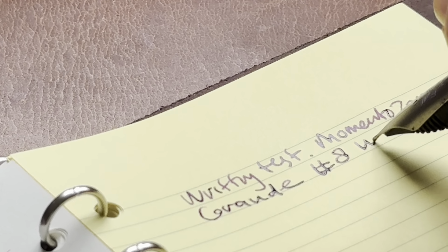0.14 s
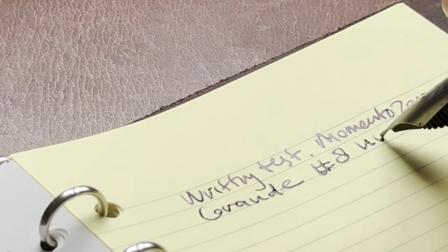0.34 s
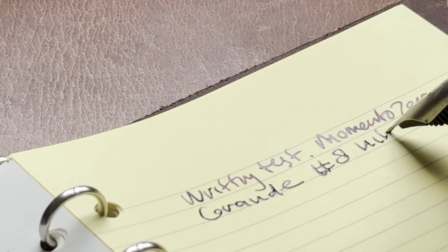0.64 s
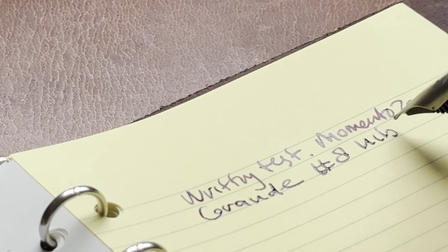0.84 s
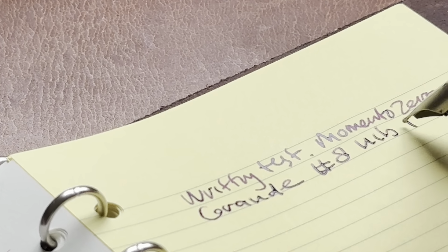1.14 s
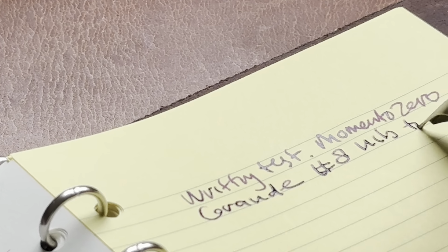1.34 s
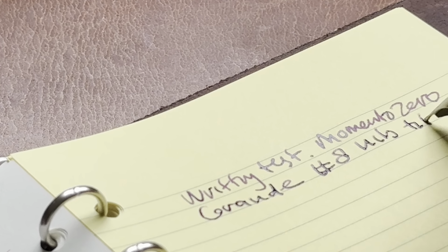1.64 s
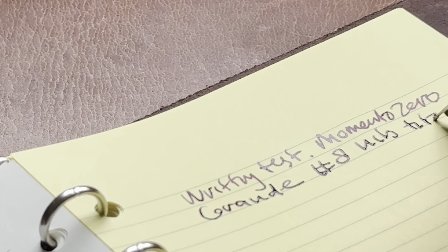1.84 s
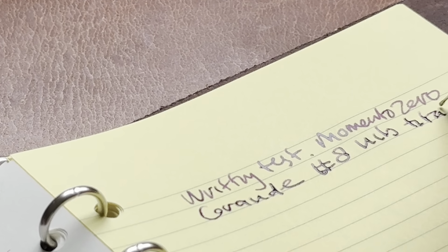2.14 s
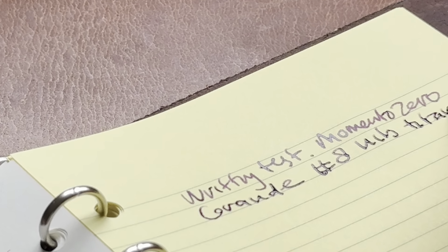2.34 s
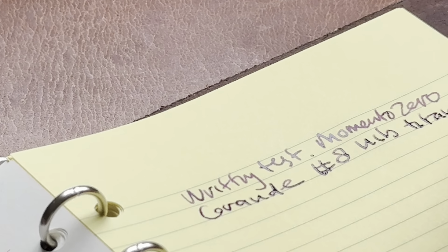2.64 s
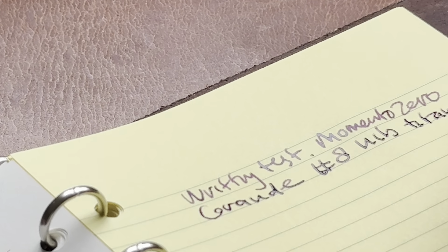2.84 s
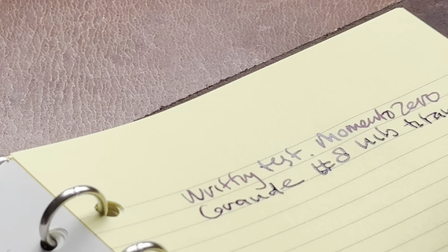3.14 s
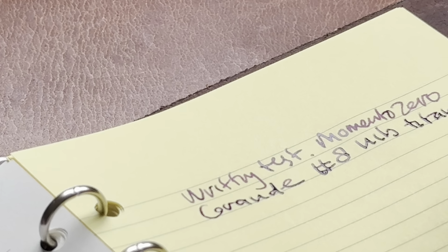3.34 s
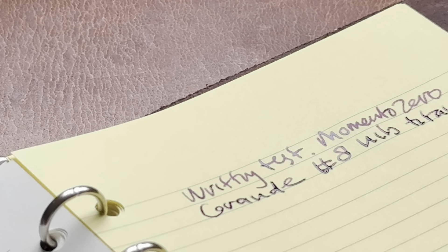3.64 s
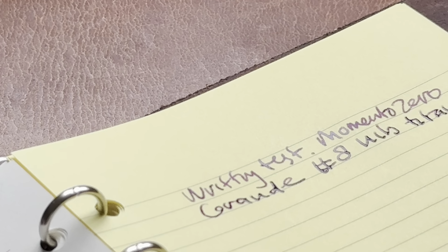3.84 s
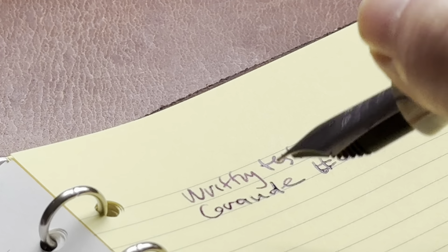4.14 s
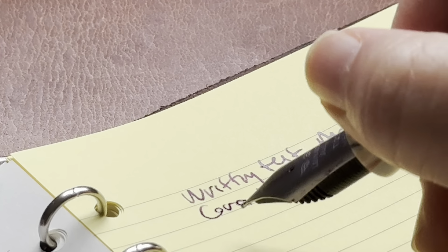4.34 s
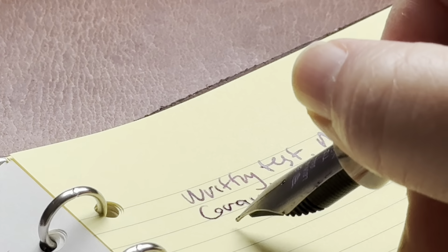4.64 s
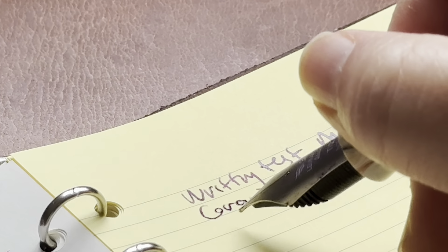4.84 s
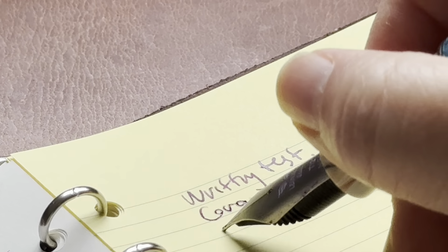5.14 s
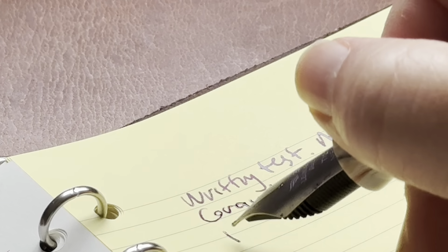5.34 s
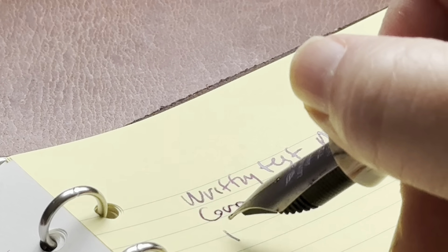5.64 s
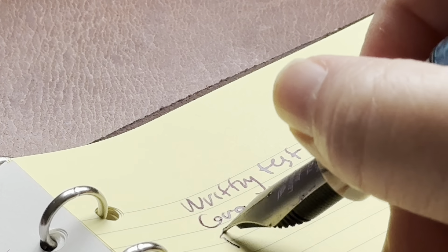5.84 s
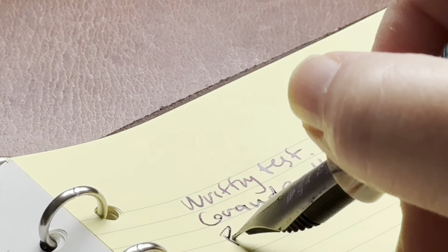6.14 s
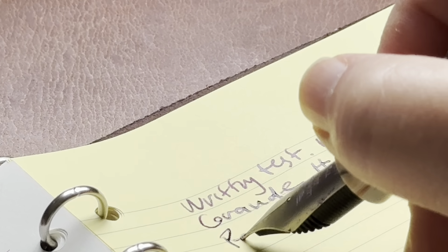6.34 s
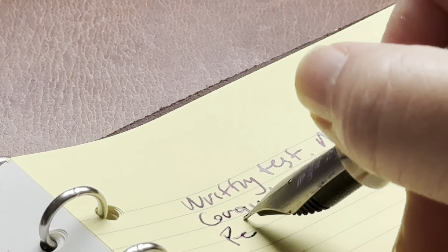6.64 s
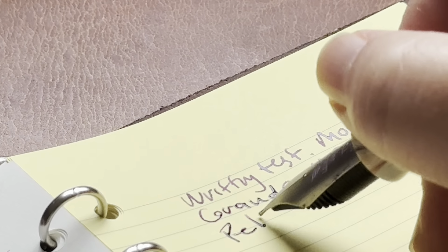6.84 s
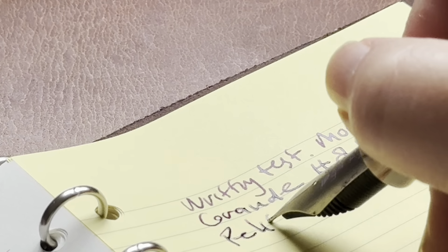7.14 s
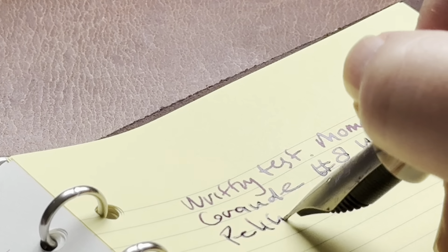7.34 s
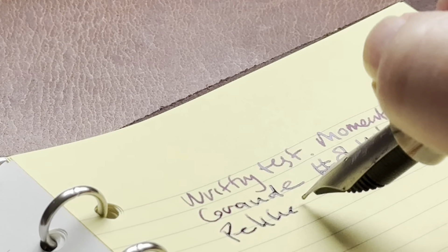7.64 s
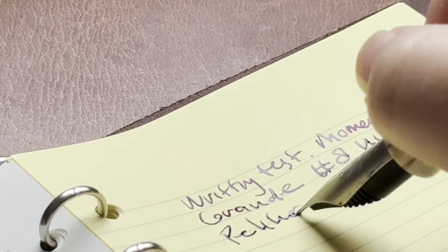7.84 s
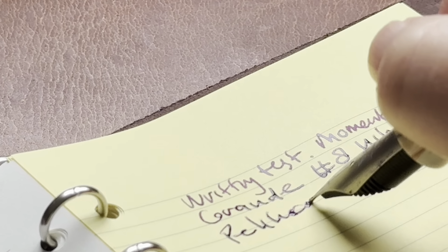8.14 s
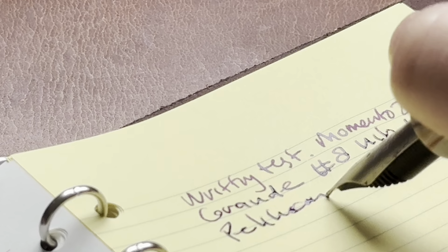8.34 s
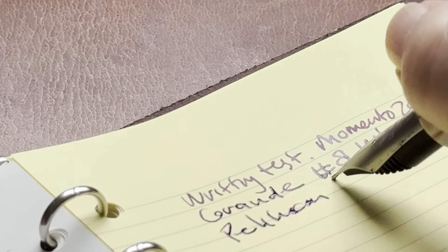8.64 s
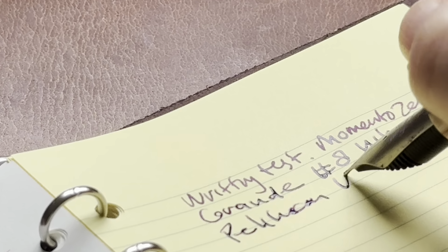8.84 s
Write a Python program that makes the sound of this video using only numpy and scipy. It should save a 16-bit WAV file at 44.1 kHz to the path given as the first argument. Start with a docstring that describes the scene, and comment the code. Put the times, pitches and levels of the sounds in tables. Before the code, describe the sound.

A close stereo microphone in a small quiet room picks up a fountain pen on paper. From 0 to 2.7 s come quick, thin, dry scratches, each about a tenth of a second, with faint ticks and a soft hiss of the sliding hand. Beneath them a low engine tone outside rises slightly, then drops in pitch and fades out by 3 s, amid traffic rumble. A few more light strokes end near 3.5 s. From 3.4 to 4.1 s the hand shifts in soft, dull puffs. A faint pause follows, with distant tyre wash swelling around 5 to 5.5 s. Writing resumes at about 5.2 s, louder and crisper, with sharp little nib clicks between 5.8 and 7.6 s and scratches until 8.3 s. At 8.4 s the hand brushes the page with a short bright swish, and a low desk thud lands at 8.5 s. Two last strokes follow over quiet rumble and hiss.

```python
"""A fountain pen writes on a pad of paper near a stereo microphone, in a quiet room.
Each stroke excites nib and paper resonances with fibre clicks; tip noise and damped modes tick at the nib.
The hand moves to a new line in soft noise puffs, rubs the page, then brushes it and bumps the desk.
Outside, a harmonic engine tone drones and fades while filtered noise carries two far vehicles,
over low noise swells, far traffic and microphone hiss."""
import sys
import numpy as np
from scipy import signal
from scipy.fft import rfft, irfft, next_fast_len
from scipy.io import wavfile
from scipy.ndimage import uniform_filter1d

SR = 44100
rng = np.random.default_rng(int(sys.argv[2]) if len(sys.argv) > 2 else 0)


def transcribe(u):
    """Save the signal u as a 16-bit wav file named by the first command-line argument.

    u: samples, shape (n,) or (channels, n), limited to [-1, 1]; the rate is SR.
    q: integer samples, one column per channel.
    """
    v = np.clip(np.atleast_2d(u).T, -1, 1)
    q = np.round(v * 32767).astype(np.int16)
    wavfile.write(sys.argv[1], SR, q)


N = 396459
TIME = np.arange(N) / SR

# rumble of traffic through the walls: (frequency [Hz], relative level [dB])
RUMBLE = [(15, -58), (30, -19.5), (45, -3.5), (58, 2.5), (80, 3), (105, -0.5), (135, -3), (165, -5),
          (195, -7.5), (245, -6), (290, -18), (390, -20.5), (550, -37), (900, -46.5), (4000, -110)]


def amp(db):
    """Decibel law: 20 dB is a tenfold amplitude."""
    return 10 ** (np.asarray(db) / 20)


def evened(x):
    """Power normalisation to an rms of 1."""
    return x / np.sqrt(np.mean(x ** 2) + 1e-30)


def read(points, hz):
    """Interpolation of a spectrum on a log-frequency axis, as hearing spaces pitch."""
    f, value = np.transpose(points)
    return np.interp(np.log(hz + 1), np.log(f + 1), value)


def along(rows, t):
    """Linear interpolation in time of every column after the first."""
    s, *columns = np.transpose(rows)
    return [np.interp(t, s, c) for c in columns]


def add(mix, s, sound):
    """Superposition: a sound is summed into the mix from time s on."""
    start = round(s * SR)
    sound = sound[max(-start, 0):]
    part = mix[max(start, 0):][:len(sound)]
    part += sound[:len(part)]


def band(x, lo_hz, hi_hz, order=2):
    """Band-pass filtering with a Butterworth response."""
    sos = signal.butter(order, [lo_hz, min(hi_hz, .49 * SR)], "band", fs=SR, output="sos")
    return signal.sosfilt(sos, x)


def drift(size, hz):
    """Low-passed noise: slow chance of rms 1, changing about hz times a second."""
    f = np.fft.rfftfreq(size, 1 / SR)
    noise = rfft(rng.standard_normal(size))
    return evened(irfft(noise * np.exp(-(f / hz) ** 2), size))


def swell(t, rise, fall, squareness=2.7):
    """Bell-shaped motion: peak 1 at t = 0, down to 1/e after the rise or fall time."""
    return np.exp(-abs(t / np.where(t < 0, rise, fall)) ** squareness)


def nearness(t, s, width_s):
    """Inverse-distance law for a pass on a straight road: 1 at time s, 3 dB less width_s away."""
    return 1 / np.hypot(1, (t - s) / width_s)


def diffuse(spectrum, shift=1, patchy_db=1.0, size=2048):
    """Diffuse-field coherence: noise partly alike at two ports; shift scales its frequencies."""
    # likeness of the ports in diffuse sound: (frequency [Hz], correlation [0-1])
    likeness = [(60, 1), (150, 0.96), (300, 0.87), (750, 0.43), (1200, 0.64), (2200, 0.97), (6000, 0.98),
                (8000, 0.94), (10000, 0.92), (15000, 0.85)]
    hop = size // 4
    t = np.arange(N // hop + 5) * hop / SR
    hz = np.fft.rfftfreq(size, 1 / SR)
    a, b, c, d, patches = rng.standard_normal((len(t), len(hz), 5)).T
    same = np.clip(read(likeness, hz), -1, 1)[:, None]
    left = a + 1j * b
    right = same * left + np.sqrt(1 - same ** 2) * (c + 1j * d)
    # the spectrum is patchy in time and frequency
    patches = uniform_filter1d(patches, size=6, axis=0)
    patches = evened(uniform_filter1d(patches, size=8, axis=1))
    scale = shift(t) if callable(shift) else shift
    colour_db = read(spectrum, hz[:, None] / scale) + patchy_db * patches
    frames = np.array([left, right]) * amp(colour_db)
    return evened(signal.istft(frames, nperseg=size, noverlap=size - hop)[1][:, :N])


def fibres(speed, base_rate_hz=2000, spread_db=2.5, smooth=0.91, tooth_db=1.33):
    """Stick-slip on paper fibres: random clicks, denser as the nib runs faster, over a smooth slide."""
    chance, size = rng.random((2, len(speed)))
    sign, slide = rng.standard_normal((2, len(speed)))
    density = 0.41 + 0.71 * speed  # scales the base rate of catches
    height = amp(spread_db * np.minimum(-np.log(1 - size), 3.5))  # most catches are small, a few large
    catches = (chance < base_rate_hz * density / SR) * np.sign(sign) * height
    friction = evened(catches / np.sqrt(density)) + smooth * slide
    return friction * amp(tooth_db * drift(len(speed), 100))


def strokes(body_db=1.5, ripple_db=4.0, paper_width_hz=200, paper_spread=0.044,
            nib_db=2.0, nib_width_hz=230, size=16384):
    """Source-filter principle: fibre clicks excite nib and paper resonances that vary over the page."""
    # pen strokes, timed between the 1/e points of their speed: (start [s], length [s],
    # level of 4.5-9 kHz at full speed [dB], weight: level of 0.3-4.5 kHz relative to it, less body_db [dB])
    stroke_rows = [(0, 0.14, -89.5, 10), (.22, 0.12, -92.5, 14.5), (0.439, 0.086, -85.5, 9),
                   (.557, 0.054, -83, 2), (.63, 0.17, -93.5, 12), (.972, 0.089, -82.5, 9),
                   (1.193, 0.057, -78.5, 0.5), (1.249, 0.12, -91.5, 11), (1.477, 0.097, -82.5, 5),
                   (1.685, 0.071, -75, -0.5), (1.777, 0.072, -84, 2.5), (1.887, 0.057, -80, 2),
                   (1.975, 0.063, -93, 13), (2.18, 0.086, -94.5, 11.5), (2.285, 0.049, -85, 0),
                   (2.349, .11, -101, 16), (2.564, 0.11, -90.5, 8), (2.65, .065, -81.5, 0.5),
                   (2.87, .063, -92.5, 10), (2.99, 0.059, -80.5, -4), (3.083, 0.077, -90, 10.5),
                   (3.19, 0.048, -80.5, 0), (3.287, 0.1, -92, 9.5), (3.434, 0.1, -96.5, 10),
                   (3.8, .2, -100, 10), (4.115, .04, -82.5, 9.5), (5.198, 0.055, -71.5, 12),
                   (5.225, 0.062, -93, 25), (5.818, 0.056, -67, -1), (5.943, .046, -66, 6.5),
                   (6.177, 0.055, -70.5, 3.5), (6.275, 0.067, -85.5, 10.5), (6.357, 0.062, -73.5, 7.5),
                   (6.658, 0.088, -74, 12), (6.885, .086, -82, 15), (7.115, 0.073, -76, 11.5),
                   (7.213, .047, -76.5, 2.5), (7.294, 0.095, -91, 18.5), (7.354, 0.054, -72.5, -2),
                   (7.452, 0.072, -86, 2), (7.68, 0.055, -87.5, 19), (7.742, .07, -79.5, 5.5),
                   (7.834, 0.057, -66, -0.5), (7.935, .066, -86.5, 5), (8.035, .065, -79.5, 2.5),
                   (8.13, 0.048, -85.5, 8.5), (8.2, 0.054, -75.5, 2), (8.292, 0.054, -90, 12.5),
                   (8.672, 0.072, -75, 5.5), (8.781, 0.057, -72, 3)]
    # scratch colour at the end of a line: (frequency [Hz], relative level [dB])
    line_end = [(900, -12), (1800, 0.5), (2700, -12), (3500, -11), (4500, -11), (6500, -4.5), (7100, -12),
                (7700, -7), (8700, -12.5), (10200, 9.5), (11800, 5), (13000, -5), (15500, -16)]
    # scratch colour on the fresh line: (frequency [Hz], relative level [dB])
    new_line = [(700, -5.5), (1200, 1.5), (2000, -3), (2330, 1), (2900, -7.5), (3400, -6.5), (4300, -15),
                (5100, -17.5), (5750, -9), (7100, -18.5), (8800, -20.5), (10100, 0.5), (12200, -5.5),
                (15500, -21)]
    new_line_s = 4.0
    # the fizz above 9 kHz has level fizz_ref_db on a stroke of stroke_ref_db at zero weight
    stroke_ref_db, fizz_ref_db = -80, -74
    fizz_growth = .78  # dB gained per dB of scratch
    fizz_damping = 0.11  # dB lost per dB of weight
    out = np.zeros(N)
    t = (np.arange(size) - size / 2) / SR
    hz = np.fft.rfftfreq(size, 1 / SR)
    zone = np.digitize(hz, [300, 4500, 9000])
    knots = np.arange(0, SR / 2, 180)
    for start, length, db, weight in stroke_rows:
        # share of the stroke spent speeding up; paper resonance, its fall per dB of weight, its height
        if start < new_line_s:
            colour = line_end
            share, sheet_hz, sag_hz, paper_db = .43, 3550, 3, 8.8
        else:
            colour = new_line
            share, sheet_hz, sag_hz, paper_db = .28, 2540, 36.5, 5
        rise = share * length
        starting = swell(t, rise, rise, squareness=2.27)
        coasting = swell(t, rise, length - rise, squareness=1.96)
        speed = np.where(t < 0, starting, coasting)
        paper_hz = (sheet_hz - sag_hz * weight) * (1 + paper_spread * rng.standard_normal())
        place_db = ripple_db * np.interp(hz, knots, rng.standard_normal(len(knots)))
        place_db += paper_db / (1 + ((hz - paper_hz) / paper_width_hz) ** 2)  # the sheet rings under the nib
        nib_hz = rng.uniform(4850, 6800)  # the tines ring higher or lower as they flex
        place_db += nib_db / (1 + ((hz - nib_hz) / nib_width_hz) ** 2)
        spectrum = rfft(fibres(speed)) * amp(read(colour, hz) + place_db)
        fizz_db = fizz_ref_db + fizz_growth * (db - stroke_ref_db) - fizz_damping * weight
        # body, scratch and fizz bands each get their own level
        for k, zone_db in enumerate([db + weight + body_db, db, fizz_db]):
            part = irfft(spectrum * (zone == k + 1)) * speed
            part *= np.linalg.norm(speed) / np.linalg.norm(part)
            add(out, start + rise + t[0], amp(zone_db) * part)
    return out


def ticks(ring_db=-1.0, snap_s=0.00042, rattle_db=-17, rattle_s=0.015, size=1500, count=176):
    """Impact and modal decay: the tip snaps on the paper and the gripped pen rings for milliseconds."""
    # the nib lands on or leaves the paper: (time [s], level of the pen's ring, less ring_db [dB])
    tick_rows = [(0.202, -84), (0.925, -86), (1.451, -82), (2.154, -86), (2.8241, -85), (3.9845, -86),
                 (4.121, -73), (5.139, -78), (5.2821, -59), (5.307, -67), (5.7739, -69), (5.7782, -56),
                 (5.9895, -64), (6.0257, -55.5), (6.1267, -69), (6.4247, -56.5), (6.6208, -70),
                 (6.7752, -55), (6.8552, -71), (6.9661, -54), (7.083, -69), (7.5457, -56), (8.6076, -78),
                 (8.9674, -78)]
    # pen modes before the grip tunes them: (frequency [Hz], relative level [dB], 60 dB decay time [s])
    pen_modes = [(1270, 4, 0.0043), (1660, -17, 0.0069), (2680, -2, 0.012), (3140, 12.5, 0.002),
                 (3758, -2, 0.0041), (4200, -16, 0.018), (7100, -31, .004), (9600, -9, .003)]
    pen_hz, grip_hz = 3000, 3010  # centre of the ring in the table, and as the grip tunes it
    # the snap hardly grows with the blow: its level on a tick of tick_ref_db, and dB gained per dB
    tick_ref_db, snap_ref_db, snap_growth = -57, -74.5, 0.16
    out, t = np.zeros(N), np.arange(size) / SR
    for s, db in tick_rows:
        grip = grip_hz / pen_hz * (1 + 0.065 * rng.standard_normal(len(pen_modes)))
        pen = np.zeros(size)
        for k, (hz, mode_db, t60) in enumerate(pen_modes):
            sign = (-1) ** k  # neighbouring modes swing in opposite directions
            pen += sign * amp(mode_db - 60 * t / t60) * np.sin(2 * np.pi * hz * grip[k] * t)
        decay = np.exp(-t / snap_s) + amp(rattle_db) * np.exp(-t / rattle_s)
        tip = band(rng.standard_normal(size) * decay, 4900, 14400)
        pen = band(pen, 1200, 13000)
        snap_db = snap_ref_db + snap_growth * (db - tick_ref_db)
        # levels refer to the first count samples, about 4 ms
        ring = amp(db + ring_db) * pen / pen[:count].std()
        snap = amp(snap_db) * tip / tip[:count].std()
        add(out, s, ring + snap)
    return out


def shuffles(attack_s=0.0038, decay_s=0.021, size=4000):
    """Friction bursts: dull band-limited noise puffs as the hand skips across the pad."""
    # small soft jerks of the hand: (time [s], level of 280-700 Hz before the envelope [dB])
    jerks = [(3.362, -63.5), (3.442, -64), (3.535, -64), (3.62, -65), (3.73, -62), (3.809, -64),
             (3.923, -60), (4.093, -58)]
    out, t = np.zeros(N), np.arange(size) / SR
    for s, db in jerks:
        skin = rng.standard_normal(size)
        puff = evened(band(skin, 280, 700)) + 0.15 * evened(band(skin, 800, 1800))
        envelope = np.exp(-t / decay_s) * (1 - np.exp(-t / attack_s))
        add(out, s, amp(db) * puff * envelope)
    return out


def rub():
    """Sliding friction: the side of the hand hisses on the page, louder as it moves faster."""
    # slides of the hand: (time at its fastest [s], rise [s], fall [s], level [dB])
    slides = [(.3, 1.2, 2.1, -81.5), (3.9, 0.18, 0.43, -85), (4.95, 0.43, 1, -82), (6.3, 0.67, 0.19, -75.5),
              (7.25, 0.6, 1.25, -77)]
    # colour of the rub: (frequency [Hz], relative level [dB])
    rub_colour = [(600, -26), (1500, 6), (2200, 5.5), (2800, -3.5), (3400, -3), (4000, -10.5),
                  (5500, -11.5), (9000, -28.5)]
    power = sum((amp(db) * swell(TIME - s, rise, fall)) ** 2 for s, rise, fall, db in slides)
    return np.sqrt(power) * diffuse(rub_colour, patchy_db=4.5, size=1024)


def brush(s=8.42, rise=0.042, fall=0.051, level_db=-63.0):
    """Broadband friction noise: the hand sweeps off the page with an even, bright swish."""
    swish = evened(band(rng.standard_normal(N), 3600, 18300, order=1))
    return amp(level_db) * swish * swell(TIME - s, rise, fall)


def bump(s=8.4995, hz=84, level_db=-35.5, peak_s=.011, rise=.012, fall=.015, sag=9.0):
    """Damped oscillation: a thud of the desk that sinks in pitch, passing hz at its peak."""
    t = np.arange(-4 * rise, 6 * fall, 1 / SR)
    out = np.zeros(N)
    thud = np.sin(2 * np.pi * hz * t * (1 - sag * (t - 2 * peak_s)))
    add(out, s + t[0], amp(level_db) * thud * swell(t - peak_s, rise, fall))
    return out


def engine(waver=0.67, follow=0.17):
    """Harmonic synthesis: a firing tone fades; the room swells its fundamental more than its overtones."""
    # engine outside: (time [s], firing rate [Hz], level before the harmonic's own [dB])
    engine_curve = [(0, 54.5, -45.5), (.1, 53.2, -48), (.18, 57.75, -41.5), (.7, 60, -41), (.86, 59.8, -51),
                    (1.3, 57.7, -48), (1.53, 56.9, -44), (2.05, 54.7, -43), (2.6, 50.2, -55.5),
                    (2.95, 47.54, -59)]
    # harmonics: (multiple of the firing rate [-], relative level [dB])
    orders = [(1, -0.5), (2, -15), (3, -19), (4, -25.5)]
    pass_s, width_s, pass_db = 0.82, 0.43, -44.5  # the overtones swell as the engine goes by
    hz, db = along(engine_curve, TIME)
    turns = np.cumsum(hz) / SR
    passing = amp(pass_db) * nearness(TIME, pass_s, width_s)
    overtones = amp(db) ** follow * passing ** (1 - follow)
    tone = np.zeros(N)
    for k, order_db in orders:
        if k == 1:
            height = amp(db)
        else:
            height = overtones * (1 + waver * (drift(N, 3.8) + 1j * drift(N, 6.3)))  # unsteady
        tone += amp(order_db) * (height * np.exp(2j * np.pi * (k * turns + rng.random()))).real
    fade = np.clip((3.1 - TIME) / 0.35, 0, 1)
    return np.sqrt(2) * tone * fade  # root 2 makes the levels rms


def vehicle(s, width_s, rumble_db, tyre_db):
    """Inverse-distance spreading: rumble and tyre wash swell and fade; the wash brightens when close."""
    # far wash of tyres: (frequency before brightening [Hz], relative level [dB])
    wash = [(200, -1), (380, 0), (480, -4.5), (620, -5), (850, -3), (1080, 2), (1350, 1), (1580, -10.5),
            (2050, -10), (2450, -21), (3300, -23.5), (4500, -30.5), (9000, -64)]
    tyre_lag_s = 0.36  # the wash peaks this long after the rumble
    tyre_fall = 1.05  # power by which the wash falls with distance
    brightening = .05  # greatest share by which the wash rises in pitch
    rumble = diffuse(RUMBLE, patchy_db=2.0, size=4096) * nearness(TIME, s, width_s)

    def rise_in_pitch(t):
        """Frequency scaling of the wash by closeness."""
        return 1 + brightening * nearness(t, s + tyre_lag_s, width_s) ** 2

    tyres = diffuse(wash, rise_in_pitch, patchy_db=2.46)
    tyres = tyres * nearness(TIME, s + tyre_lag_s, width_s) ** tyre_fall
    return amp(rumble_db) * rumble + amp(tyre_db) * tyres


def low_swells():
    """Narrow-band resonance: low noise swells and sinks, sliding in pitch from swell to swell."""
    # the room booming with traffic and, at 7.92 s, the desk swaying briefly under the pen:
    # (time at the top [s], rise [s], fall [s], level [dB], pitch [Hz])
    swell_rows = [(1.08, 0.36, 0.16, -47.5, 81.2), (1.8, 0.72, 0.39, -53, 85.2),
                  (2.42, 0.063, .1, -50.5, 80.3), (2.82, 0.17, 0.23, -60, 85),
                  (3.65, 0.26, 0.8, -59.5, 88.4), (5.05, 0.62, 1, -57, 93), (7.92, 0.065, 0.16, -59, 55.6)]
    # resonance as centred at centre_hz: (frequency [Hz], relative level [dB])
    resonance = [(15, -73), (50, -29), (68, -17), (79, 3.5), (85, 7), (91, 8.5), (104, -11.5), (170, -52.5),
                 (500, -120)]
    centre_hz = 85
    power = sum((amp(db) * swell(TIME - s, rise, fall)) ** 2 for s, rise, fall, db, hz in swell_rows)
    noise = diffuse(resonance, lambda t: along(swell_rows, t)[-1] / centre_hz, patchy_db=0.0, size=8192)
    return np.sqrt(power) * noise


def background(rumble_db=-64.5, hiss_db=-85.5):
    """Stationary noise: the rumble of streets further off and the microphone's own hiss."""
    # microphone hiss: (frequency [Hz], relative level [dB])
    hiss_colour = [(100, 0), (3500, 1), (6000, .3), (8500, -1.5), (11000, -3.7), (13000, -2.7),
                   (15000, 1.5)]
    rumble = diffuse(RUMBLE, patchy_db=3.0, size=4096)
    hiss = diffuse(hiss_colour, patchy_db=0.5, size=1024)
    return amp(rumble_db) * rumble + amp(hiss_db) * hiss


def room(x, t60, wet_db, size=12000):
    """Reverberation by convolution: a short, decaying noise tail, different at each port."""
    t = np.arange(size) / SR
    tail = rng.standard_normal((2, size)) * amp(-60 * t / t60) * (t > .002)
    tail /= np.linalg.norm(tail[0])
    return x + amp(wet_db) * signal.fftconvolve(x[None], tail, axes=1)[:, :N]


def scene():
    """Superposition of near and far fields: pen, hand and desk close by, the street far behind."""
    # passing vehicles: (time when nearest [s], time for nearness to fall by 3 dB [s],
    # rumble level [dB], tyre wash level [dB])
    vehicles = [(.45, 1.11, -53, -71.5), (5.15, 1.5, -59, -66.5)]
    hand = room(strokes() + shuffles() + brush(), t60=0.071, wet_db=-30.0)
    writing = hand + room(ticks(), t60=0.11, wet_db=-9.0)
    street = engine() + sum(vehicle(*row) for row in vehicles)
    return writing + rub() + bump() + street + low_swells() + background()


def record(dry, edge_hz=15800):
    """Interchannel phase and level differences of two microphone ports, then a low-pass band limit."""
    # phase between the ports: (frequency [Hz], lead of the left [rad])
    port_phase = [(400, 0), (1100, -.45), (2000, -.1), (3300, .55), (4900, 0), (8400, 0), (9400, -3.1),
                  (11100, -6.3), (12700, -9.4), (13850, -12.5), (14400, -12.6), (15300, -15.7)]
    # balance of the ports: (frequency [Hz], left minus right [dB])
    balance = [(50, 0.94), (250, 2.5), (600, 0), (1300, 4), (2000, 0.3), (4000, 0)]
    size = next_fast_len(N + 4096)
    hz = np.fft.rfftfreq(size, 1 / SR)
    lean_db = read(balance, hz) / 2
    ports = np.array([amp(lean_db), amp(-lean_db) * np.exp(-1j * read(port_phase, hz))])
    heard = irfft(rfft(dry, size) * ports, size)[:, :N]
    low_pass = signal.firwin(511, edge_hz, window=("kaiser", 9), fs=SR)
    return signal.oaconvolve(heard, low_pass[None], "same")


dry = scene()
out = record(dry)
transcribe(out)
```